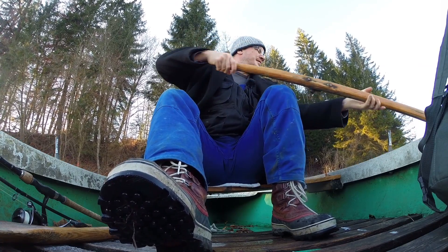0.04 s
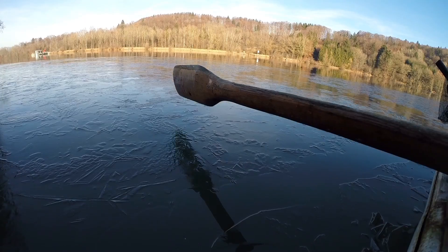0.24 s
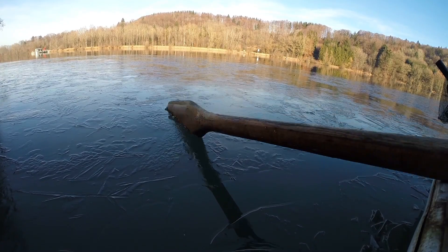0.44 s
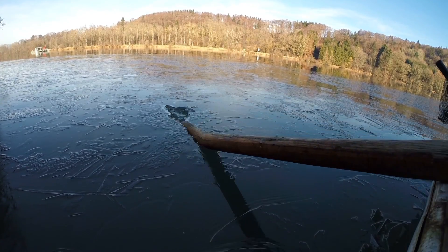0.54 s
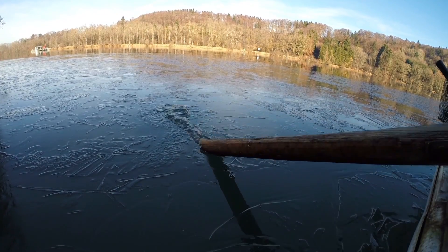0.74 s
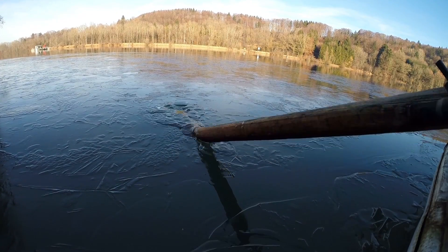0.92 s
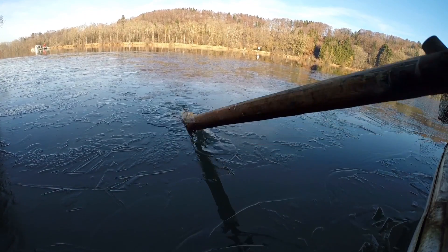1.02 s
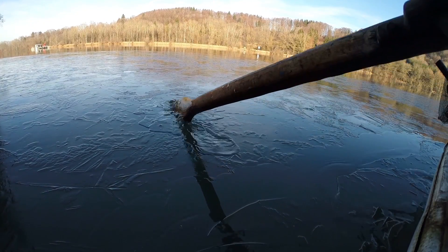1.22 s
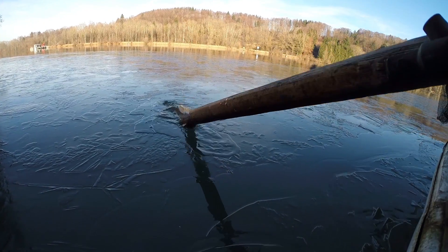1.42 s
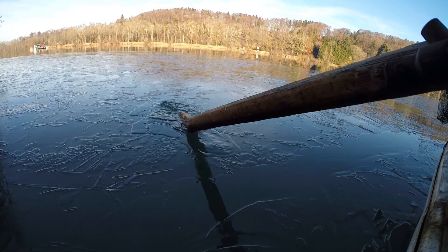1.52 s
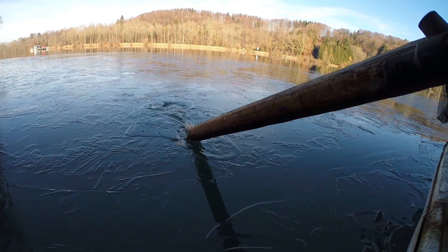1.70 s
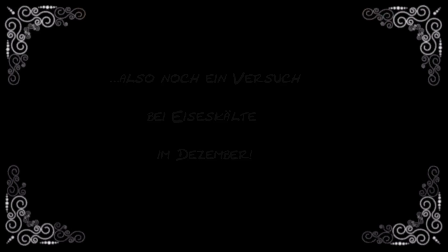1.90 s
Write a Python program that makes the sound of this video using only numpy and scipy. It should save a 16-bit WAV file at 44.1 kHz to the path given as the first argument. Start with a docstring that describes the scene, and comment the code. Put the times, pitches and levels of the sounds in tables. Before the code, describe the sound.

An oar crunches through thin ice on a quiet lake, just after a few hollow knocks against the boat. Small shards then clink and scrape along the blade with faint water gulps, heard close over a soft hiss.

```python
"""An oar breaking thin ice

An oar bumps a rowing boat and makes the hull ring, then crunches through thin lake ice and splashes in.
Shards clink and scrape along the blade, over a quiet outdoor hiss and a low rumble of air.
The sound keeps cutting out for split seconds, and stops dead just before the end."""
import sys
import numpy as np
from scipy import signal
from scipy.fft import rfft, irfft, next_fast_len
from scipy.io import wavfile

SR = 44100
rng = np.random.default_rng(int(sys.argv[2]) if len(sys.argv) > 2 else 0)


def int16_out(signal):
    """Quantize to a 16-bit WAV file."""
    q = np.round(np.clip(np.atleast_2d(signal).T, -1, 1) * 32767)
    wavfile.write(sys.argv[1], SR, q.astype(np.int16))


N = 85995

# The blade crushes the ice. Each row: time in seconds, level in dB.
CRUNCH_LEVELS = [(0.44, -68), (0.449, -25), (0.458, -20.5), (0.51, -27.5), (0.532, -22.5), (0.555, -32),
                 (0.57, -45), (0.59, -36), (0.68, -43), (0.708, -41.5), (0.725, -54), (0.8, -53.5),
                 (0.95, -55), (1.0, -51), (1.1, -57), (1.27, -58), (1.42, -56), (1.55, -59)]
# The bigger cracks. Each row: start in seconds, level in dB, pitch in Hz.
BIG_CRACKS = [(0.4481, -25, 1020), (0.4555, -14.5, 2730), (0.4591, -18, 3280), (0.476, -17, 4230),
              (0.4912, -12, 3400), (0.498, -13.5, 3630), (0.5052, -14, 3030), (0.5095, -19.5, 4760),
              (0.5142, -22.5, 2840), (0.524, -50, 2500), (0.549, -32, 3870), (0.576, -30, 4550),
              (0.596, -29.5, 3250), (0.6198, -29, 3720), (0.6252, -23.5, 4060), (0.6355, -40, 3600),
              (0.6475, -43, 3850), (0.6639, -29, 3770), (0.6741, -25.5, 4600), (0.684, -31.5, 1670),
              (0.692, -31, 4250)]
# The ice sheet and the blade ring. Each row: pitch in Hz, width in Hz, boost in dB.
ICE_RINGS = [(399, 47, 5), (947, 54, 4.5), (1050, 27, 7), (1567, 70, 3.5), (2096, 120, 4.5),
             (2680, 87, 4.5), (2980, 22, 4), (3146, 45, 8), (3430, 27, 10), (3460, 23, 10.5),
             (3916, 35, 0.5), (4100, 35, 7.5), (4667, 35, 9)]
# The oar bumps the boat. Each row: start in seconds, level in dB.
OAR_BUMPS = [(0.2232, -18), (0.2326, -18), (0.2621, -23), (0.2829, -19), (0.301, -28), (0.318, -24),
             (0.3347, -17.5), (0.36, -19.5), (0.381, -19.5), (0.405, -26.5), (0.442, -30.5), (0.485, -35),
             (0.513, -18.5), (0.556, -27.5), (0.616, -28)]
# The hull's notes. Each row: pitch in Hz, level in dB, seconds to fade by 60 dB.
HULL_NOTES = [(112.4, 1.5, 0.091), (162.7, -11.5, 0.16), (239.8, -12.5, 0.16), (247, -11, 0.068),
              (295, -29.5, 0.11), (431, -9, 0.038), (544, -12, 0.024), (864, -27, .04)]
# The oar rubs in its rowlock. Each row: start in seconds, length in seconds, level in dB.
ROWLOCK_RUBS = [(0.229, 0.011, -36.5), (0.293, 0.098, -47.5), (0.402, 0.027, -37)]
# Shards hit the blade. Each row: start in seconds, level in dB, pitch in Hz,
# seconds for the ping to fade by 60 dB, knock level in dB compared with the shard.
SHARD_HITS = [(0.1048, -27, 3180, .012, -18.5), (0.652, -27, 3780, 0.028, -28),
              (0.702, -35.5, 2040, 0.026, -14), (0.7495, -39.5, 3470, 0.011, -27),
              (0.876, -35.5, 4460, 0.017, -30), (0.956, -37.5, 3900, 0.04, -26),
              (0.971, -33.5, 5300, 0.023, -21), (0.985, -50, 1500, 0.028, -5),
              (1.001, -44.5, 3980, 0.038, -18), (1.0234, -40.5, 2150, 0.02, -24),
              (1.0431, -33, 3750, 0.043, -27), (1.0627, -37.5, 3680, .025, -24),
              (1.0745, -37, 3710, 0.015, -5), (1.128, -41.5, 2140, 0.015, -3),
              (1.15, -40, 3860, 0.016, -7.5), (1.153, -40.5, 2150, 0.023, -13),
              (1.226, -44, 2830, 0.046, -24), (1.2624, -41, 2010, 0.069, -18), (1.275, -53, 2700, .03, -4),
              (1.284, -41, 2350, 0.021, -10), (1.3225, -44.5, 1430, .03, -14),
              (1.335, -47.5, 3540, 0.033, -9), (1.3496, -33, 3720, 0.025, -29),
              (1.41, -47, 2010, 0.031, -12), (1.484, -42.5, 1800, 0.032, -1),
              (1.6764, -52, 3550, 0.04, -26), (1.686, -36.5, 1960, 0.026, -1),
              (1.8336, -37, 2350, .025, -4.5), (1.843, -44, 3190, 0.03, 3.5)]
# The blade scrapes the ice. Each row: start in seconds, length in seconds, level in dB.
BLADE_SCRAPES = [(1.243, 0.06, -49.5), (1.322, 0.037, -50.5), (1.483, 0.028, -55.5), (1.686, 0.017, -43.5),
                 (1.842, 0.029, -56)]
# The scraping blade's hollow ring. Each row: pitch in Hz, width in Hz, boost in dB.
BLADE_RINGS = [(585, 72, 13), (755, 68, 17.5), (1320, 200, 9)]
# Air pockets gulp. Each row: start in seconds, level in dB, pitch in Hz, seconds to fade by 60 dB.
AIR_GULPS = [(0.617, -31.5, 395.6, 0.27), (0.618, -36, 1550, 0.12), (0.619, -38, 645, 0.11),
             (1.275, -44, 776, .08), (1.323, -38.5, 742, 0.072), (1.687, -39.5, 608, 0.066)]
# How loud the stirred water and the outdoor hiss are. Each row: time in seconds, level in dB.
SPLASH_LEVELS = [(0.435, -54), (0.452, -26), (0.52, -36.5), (0.57, -42), (0.66, -55.5), (0.74, -50.5),
                 (1.3, -63), (1.49, -52), (1.56, -70), (1.615, -42), (1.66, -56.5), (1.86, -46.5)]
HISS_LEVELS = [(0, -39), (0.16, -41.5), (0.25, -46), (0.4, -43.5), (0.75, -48.5), (0.95, -51), (1.2, -51),
               (1.5, -53), (1.85, -60.5)]
# A colour says how strong a sound's lows and highs are. Each row: frequency in Hz, level in dB.
ICE_COLOUR = [(100, -8), (300, -9), (550, -13), (800, -8), (1300, -8), (1600, -6), (2300, -7.5),
              (3100, -5.5), (4400, -4.5), (5100, -11), (6200, -11), (7600, -21.5), (10500, -28.5),
              (12000, -38.5), (13200, -67), (16000, -73)]
ROWLOCK_COLOUR = [(300, -6.5), (800, -4), (1130, 10), (1330, -9), (1530, 5), (1850, -24), (2550, -9),
                  (3400, -15), (9000, -49.5)]
CLINK_COLOUR = [(200, -30), (1000, 5), (2200, 3.5), (4500, 3), (5300, -5), (7200, -10), (9000, -16),
                (12000, -31), (16000, -35.5)]
WOOD_COLOUR = [(80, 5), (250, 6.5), (420, -3.5), (660, 8), (900, -15), (1400, -1.5), (2500, -59),
               (8000, -64)]
SCRAPING_COLOUR = [(150, -9), (400, -6.5), (1000, -2), (2200, -9), (5000, -14), (12000, -50)]
WATER_COLOUR = [(50, -17), (120, -2.5), (240, -1), (400, -4), (600, -11), (1200, -23), (4000, -53),
                (12000, -78.5)]
OUTDOOR_COLOUR = [(60, -1), (160, -0.5), (330, 1), (480, 1), (700, -7.5), (1100, -8.5), (2200, -13),
                  (3300, -14), (4500, -10), (5500, -24), (7500, -24), (9300, -39.5)]
RUMBLE_COLOUR = [(10, -8.5), (25, -1.5), (40, 1.5), (75, -2), (130, -12.5), (250, -26), (800, -58.5)]
# The sound cuts out. Each entry is a start in seconds.
GAP_STARTS = [.0085, .0868, .1129, .1391, .1652, .1913, .2175, .2436, .2697, .2958, .3219, .3481, .3742,
              .4003, .4264, .5309, 1.0272, 1.0534, 1.0795, 1.1056, 1.1317, 1.1578, 1.184, 1.2101, 1.2362,
              1.2885, 1.3146, 1.3407, 1.3668, 1.393, 1.4191, 1.4452, 1.4713, 1.4974, 1.5236, 1.5497, 1.5758,
              1.628, 1.6542, 1.6803, 1.7064, 1.7315, 1.7587, 1.7848, 1.8109, 1.8371]


def ice(breaks_per_s=3500, spread_db=2):
    """Many tiny breaks and a few big cracks make the ice sheet and the blade ring."""
    breaks = (rng.random(N) < breaks_per_s / SR) * rng.choice([-1, 1], N)
    breaks = breaks * gain(spread_db * np.clip(rng.standard_normal(N), -2, 2))
    out = coloured(breaks * loudness(CRUNCH_LEVELS), ICE_COLOUR, ICE_RINGS)
    out /= np.std(coloured(breaks, ICE_COLOUR, ICE_RINGS))
    for start, db, hz in BIG_CRACKS:
        rings = ICE_RINGS + [(hz, 0.55 * hz, 14)]  # each crack adds its own broad ring
        add(out, start, gain(db) * burst(ICE_COLOUR, rings, rise_s=0.00032, fade_s=0.012))
    return out


def boat():
    """Each bump rings the hull's notes a little differently, and the oar rubs in its rowlock."""
    out, t = np.zeros(N), np.arange(SR // 3) / SR
    for start, db in OAR_BUMPS:
        for hz, note_db, fade_s in HULL_NOTES:
            strength = gain(db + note_db + rng.normal(0, 1))
            note = np.sin(2 * np.pi * hz * (1 + rng.normal(0, 0.023)) * t)
            add(out, start, strength * note * rise_and_fade(t, 0.0019, fade_s))
    return out + rubbing(ROWLOCK_RUBS, ROWLOCK_COLOUR, spread_db=5.5)


def shards(rise_s=0.0007):
    """Each loose piece of ice cracks, pings on after the crack and knocks the wooden blade."""
    out, t = np.zeros(N), np.arange(SR // 6) / SR
    for start, db, hz, fade_s, knock_db in SHARD_HITS:
        crack = burst(CLINK_COLOUR, [(hz, 0.19 * hz, 12.5)], rise_s, 0.62 * fade_s)
        ping = gain(1) * np.sin(2 * np.pi * hz * t) * rise_and_fade(t, rise_s, fade_s)
        knock = gain(knock_db) * burst(WOOD_COLOUR, [], rise_s, fade_s=0.055)
        add(out, start, gain(db) * (crack + ping + knock))
    return out


def scrapes():
    """The blade's edge drags along the ice and rings with a hollow sound."""
    return rubbing(BLADE_SCRAPES, SCRAPING_COLOUR, spread_db=7, rings=BLADE_RINGS)


def water(pitch_rise_per_s=0.35):
    """Water washes round the blade, and trapped air rings with a rising pitch."""
    out = loudness(SPLASH_LEVELS) * noise(WATER_COLOUR)
    t = np.arange(SR // 3) / SR
    for start, db, hz, fade_s in AIR_GULPS:
        note = np.sin(2 * np.pi * hz * t * (1 + pitch_rise_per_s * t / 2))
        add(out, start, gain(db) * note * rise_and_fade(t, 0.0012, fade_s))
    return out


def air(top_hz=9800):
    """The lakeside hisses softly, and air rumbles over the microphone."""
    hiss = loudness(HISS_LEVELS) * noise(OUTDOOR_COLOUR)
    rumble = gain(-45) * noise(RUMBLE_COLOUR)
    return signal.sosfilt(signal.butter(10, top_hz, fs=SR, output="sos"), hiss + rumble)


def rubbing(strokes, colour, spread_db, rings=()):
    """Two surfaces slip unevenly, swelling and fading over each stroke."""
    slips = rng.standard_normal(N) * gain(spread_db * rng.standard_normal(N))
    swells, t = np.zeros(N), np.arange(N) / SR
    for start, length, db in strokes:
        progress = np.clip((t - start) / length, 0, 1)
        swells += gain(db) * np.sqrt(np.abs(np.sin(np.pi * progress)))
    return swells * normalise(coloured(slips, colour, rings))


def burst(colour, rings, rise_s, fade_s):
    """A short puff of noise for a crack or knock, with a strength of about 1 at its loudest."""
    shape = rise_and_fade(np.arange(SR // 6) / SR, rise_s, fade_s)
    sound = coloured(shape * rng.standard_normal(len(shape)), colour, rings)
    return sound * np.linalg.norm(shape / shape.max()) / np.linalg.norm(sound)


def noise(colour):
    """Steady noise of the given colour."""
    return normalise(coloured(rng.standard_normal(N), colour))


def coloured(sound, colour, rings=()):
    """Shape a sound's lows and highs, and boost the pitches where it rings."""
    size = 2 * next_fast_len(len(sound) // 2 + SR // 10)
    hz = np.fft.rfftfreq(size, 1 / SR)
    colour_hz, colour_db = np.transpose(colour)
    curve = gain(np.interp(np.log(hz + 1), np.log(colour_hz), colour_db))
    boost = sum(gain(db) ** 2 / (1 + (2 * (hz - pitch) / width) ** 2) for pitch, width, db in rings)
    # Fold the filter so that ringing comes after each hit, never before it.
    folded = irfft(np.log(curve * np.sqrt(1 + boost)), size)
    folded[1:size // 2] *= 2
    folded[size // 2 + 1:] = 0
    return irfft(rfft(sound, size) * np.exp(rfft(folded)), size)[:len(sound)]


def rise_and_fade(t, rise_s, fade_s):
    """Rise quickly, and die away by 60 dB every fade_s seconds."""
    return (1 - np.exp(-t / rise_s)) * np.exp(-np.log(1000) * t / fade_s)


def gain(db):
    """Turn decibels into a number to multiply by."""
    return 10 ** (np.asarray(db) / 20)


def loudness(rows):
    """Join rows of time and level into a gain for every sample."""
    return gain(np.interp(np.arange(N) / SR, *np.transpose(rows)))


def normalise(sound):
    """Bring a sound's average strength (rms) to 1."""
    return sound / np.sqrt(np.mean(sound ** 2) + 1e-20)


def add(track, start_s, sound):
    """Mix a sound into the track at the given time."""
    part = track[max(round(start_s * SR), 0):][:len(sound)]
    part += sound[:len(part)]


def scene():
    """All the sources together in one channel."""
    return (air() + boat() + ice() + shards() + scrapes() + water())[None]


def record(dry, gap_db=-34.5, beat_s=0.02, first_beat_s=0.0027, stop_s=1.863, top_hz=16300):
    """The sound drops out again and again, then stops; the very highest pitches are cut off."""
    t = np.arange(N) / SR
    volume = np.where(t < stop_s, 1.0, 0.0)
    for start in GAP_STARTS:
        end = start + (first_beat_s - start) % beat_s  # the next beat of a steady clock
        volume[(t >= start) & (t < end)] = gain(gap_db)
    size = next_fast_len(N + SR // 10)
    below_top = np.fft.rfftfreq(size, 1 / SR) < top_hz
    return irfft(rfft(dry * volume, size) * below_top, size)[:, :N]


dry = scene()
out = record(dry)
int16_out(out)
```